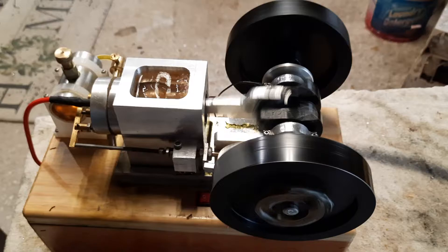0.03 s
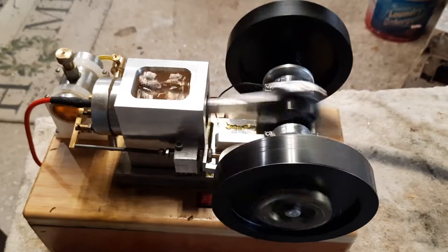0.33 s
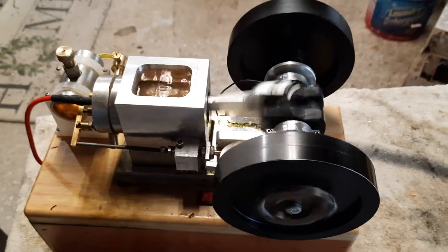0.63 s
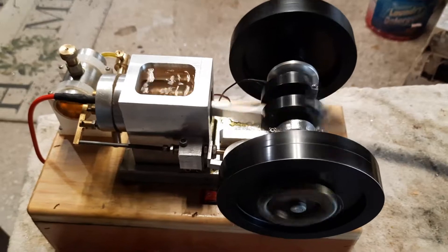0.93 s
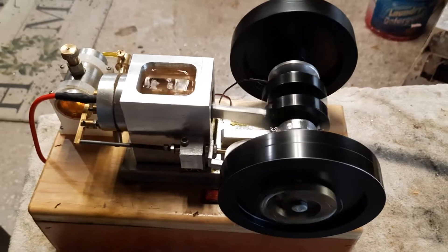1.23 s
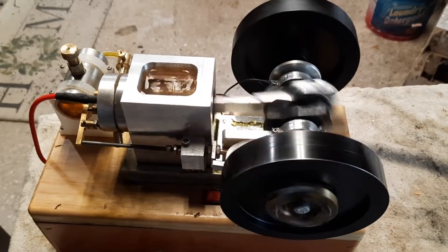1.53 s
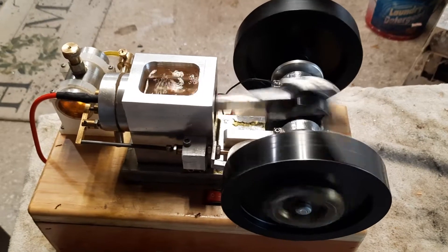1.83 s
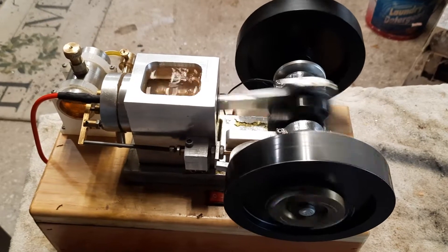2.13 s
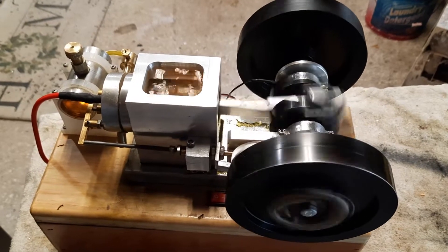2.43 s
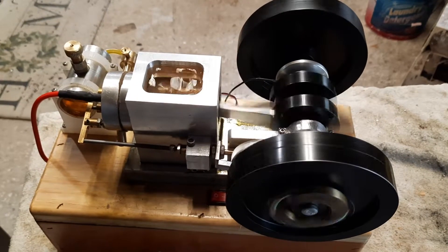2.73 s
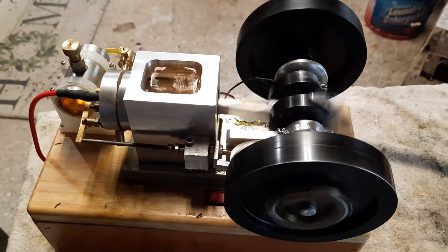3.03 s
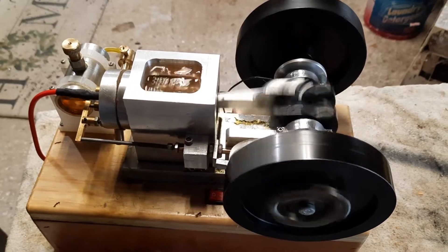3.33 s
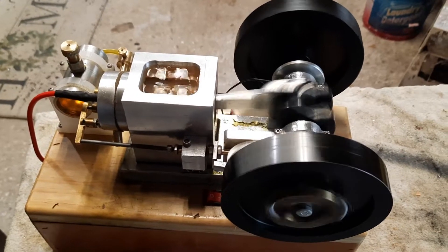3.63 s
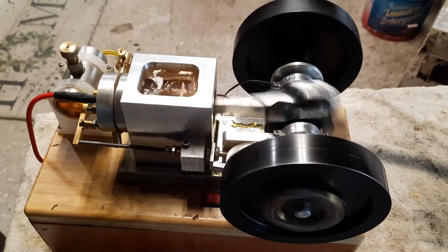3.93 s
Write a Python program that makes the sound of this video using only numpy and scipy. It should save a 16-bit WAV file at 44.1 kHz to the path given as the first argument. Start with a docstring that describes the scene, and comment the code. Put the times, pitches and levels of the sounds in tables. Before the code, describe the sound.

A small gas engine runs close by, firing irregular pops between quick knocks and chuffs.

```python
"""A model hit-and-miss gas engine

The engine runs on a wooden base, close by in a small workshop. Each firing thumps the base, then barks
from the exhaust. While the flywheels coast, the piston pumps air through the open valve once a turn and
the rod knocks at both ends of its stroke. The valve gear clicks, and the governor latch clacks once."""
import sys
import numpy as np
from scipy import signal
from scipy.fft import rfft, irfft
from scipy.io import wavfile
from scipy.ndimage import uniform_filter1d

SR = 44100
rng = np.random.default_rng(int(sys.argv[2]) if len(sys.argv) > 2 else 0)


def store_pcm(level_fs):
    """Save levels as 16-bit WAV."""
    pcm = np.round(np.clip(level_fs, -1, 1) * 32767).astype(np.int16)
    wavfile.write(sys.argv[1], SR, np.atleast_2d(pcm).T)


N = 176400
T = np.arange(N) / SR

# Levels compare the rows of one table; the functions set the final loudness.
# how loud the moving parts are, following flywheel speed: t/s, level/dB
RUNNING_LEVEL = [(.12, -31.5), (.25, -39.5), (.68, -44), (.82, -39.5), (1.3, -38), (1.68, -41.5),
                 (1.82, -35.5), (2.28, -38.5), (2.42, -35.5), (3.05, -37.5), (3.18, -36), (3.8, -36.5),
                 (4.0, -37)]
# the fuel fires: t/s, level/dB
FIRINGS = [(.128, -16), (0.7258, -14.5), (1.7189, -12), (2.3215, -11), (3.083, -10.5), (3.838, -11.5)]
# the exhaust valve opens: t/s, bark level/dB, puff level/dB
EXHAUSTS = [(0.186, -17, -17.5), (0.7777, -17.5, -19), (1.778, -15.5, -33), (2.374, -16, -26),
            (3.1357, -16, -22), (3.888, -14.7, -17.5)]
# the valve gear clicks: t/s, level/dB
CLICKS = [(.198, -27.5), (.6985, -24), (1.005, -33), (1.5105, -25), (1.6195, -30), (1.689, -21),
          (1.963, -21), (2.295, -21), (2.547, -15), (2.727, -14), (3.029, -35), (3.056, -23), (3.525, -16),
          (3.8085, -24.5)]
# the rod knocks at the end of its outward push: t/s, level/dB
KNOCKS = [(0.2225, -19), (0.3128, -14), (0.4072, -13), (0.506, -13.5), (0.6208, -25.5), (0.8098, -18.5),
          (0.8926, -13.5), (0.9786, -14), (1.0681, -11.5), (1.1614, -12.5), (1.2592, -12), (1.3619, -11.5),
          (1.8133, -16.5), (1.9047, -10.5), (2.0, -11.5), (2.0999, -10.5), (2.2158, -17), (2.3996, -31),
          (2.4914, -11), (2.5786, -10.5), (2.6694, -10.5), (2.7642, -10.5), (2.8635, -10.5), (2.9791, -21),
          (3.1683, -16.5), (3.2513, -10.5), (3.3375, -10), (3.4273, -10.5), (3.5211, -9.5), (3.6193, -9.5),
          (3.7331, -18), (3.9203, -15.5)]
# softer knocks half a turn later, and as the engine slows: t/s, level/dB
BACK_KNOCKS = [(.2677, -29), (.3599, -29), (.4563, -30.5), (.5578, -31.5), (.6841, -38), (.8513, -29),
               (.9356, -29), (1.0232, -30), (1.1146, -28), (1.2101, -29), (1.3102, -30), (1.4156, -28.5),
               (1.538, -32), (1.599, -32), (1.6725, -34), (1.8592, -26), (1.9524, -25.5), (2.0499, -25),
               (2.1523, -26), (2.2808, -32), (2.4497, -26), (2.5351, -24.5), (2.624, -27), (2.7168, -26),
               (2.8137, -28), (2.9155, -25), (3.0422, -32), (3.21, -27), (3.2944, -25), (3.3823, -27),
               (3.474, -26.5), (3.57, -26.5), (3.6706, -28), (3.7967, -32.5), (3.9616, -27)]
# air is pushed through the open valve: t/s, rough width/s, level/dB
CHUFFS = [(0.2924, 0.013, -25), (0.3837, 0.017, -26), (0.4847, 0.016, -27.5), (0.583, 0.017, -26.5),
          (0.874, 0.011, -24.5), (0.9573, 0.016, -24), (1.0489, 0.012, -24.5), (1.1407, 0.018, -25),
          (1.2364, 0.014, -26.5), (1.336, 0.017, -24.5), (1.441, 0.015, -30), (1.5606, 0.017, -25),
          (1.8857, 0.014, -23), (1.9765, 0.015, -21.5), (2.0775, 0.014, -23.5), (2.1767, 0.017, -23.5),
          (2.4718, 0.014, -22), (2.558, 0.016, -21), (2.6485, 0.013, -23), (2.742, 0.016, -22),
          (2.842, 0.013, -23.5), (2.9405, 0.017, -23), (3.2337, 0.014, -22), (3.315, 0.018, -21.5),
          (3.4082, 0.015, -23), (3.4966, 0.015, -22), (3.597, 0.015, -23.5), (3.698, 0.016, -23),
          (3.9846, 0.014, -23)]
# the piston draws in fuel and air: t/s, level/dB
INTAKES = [(0.643, -31), (1.535, -32), (1.621, -30), (2.24, -30.5), (3.0, -36), (3.76, -34)]

# ringing tones of the engine and its base: f/Hz, level/dB, time to fade by 60 dB/s
BASE_TONES = [(94, -22, .22), (114.7, -18.5, 0.36), (148.3, -14.5, 0.31), (186, -34.5, 0.37),
              (217, -16.5, 0.32), (250, -18, 0.14), (298.6, -11.5, 0.36), (320, -17, 0.35),
              (344, -14, 0.25), (421.8, -12.5, 0.18), (439.5, -23.5, 0.28), (502, -32, 0.45),
              (634, -18, .15), (696, -25.5, 0.093)]
# tones the rod rings in the frame: f/Hz, level/dB, time to fade by 60 dB/s
FRAME_TONES = [(302.7, -46, 0.35), (637, -33, 0.095), (888, -28, 0.042), (1040, -18.5, 0.071),
               (1126, -36, 0.28), (1234, -20, 0.084), (1609, -14.5, 0.15), (1683, -17, 0.31),
               (1716, -23, 0.3), (1950, -14.5, 0.05)]
# a knock's chirp, left then right: start f/Hz, end f/Hz, glide time/s, level/dB
CHIRPS = [(730, 1763, 0.002, -6), (836, 1668, 0.00091, -7)]
# how the left microphone compares with the right: f/Hz, phase lag/rad, level/dB
LEFT_VS_RIGHT = [(101, 0, 0), (600, 0.21, 2.5), (1930, 1.27, 3.5), (4170, 1.7, -4.5), (8400, 1.01, -2),
                 (13000, 1.65, -0.1), (16000, 1.9, -2)]

# The colour of each noise, or how strong it is from bass to treble: f/Hz, level/dB
BEARING_COLOUR = [(20, -43), (60, -10), (110, -3), (200, 0.5), (300, -0.5), (450, -2.5), (620, 4.5),
                  (780, -14), (1100, -6), (2000, -3.5), (3000, -5), (8000, -45.5), (16000, -72)]
SLIDE_COLOUR = [(100, -30), (500, 2), (1200, 3), (2100, 1.5), (2600, -21.5), (3150, -11), (3800, -1.5),
                (4250, -3), (4500, -17), (5400, -12), (6300, -4), (7000, -15), (8000, -13), (9500, -15.5),
                (13500, -5), (16000, -8.5)]
DRONE_COLOUR = [(100, -60), (260, -27), (296, 6), (335, -16), (700, -65), (16000, -90)]
CRACK_COLOUR = [(300, 7.5), (1000, 4), (2000, 0.5), (2800, -11), (4200, -7), (5800, -5), (8000, -15.5),
                (12000, -17), (16000, -4)]
CLICK_COLOUR = [(500, 3), (2000, 15.5), (4000, 6), (6000, 3.5), (9000, 1.5), (12000, 14.5), (16000, -1)]
BARK_COLOUR = [(200, 0), (1000, -5.5), (2000, 0), (3200, -7), (5500, 0.5), (7000, -2), (8300, 1),
               (9300, -0.5), (10600, 3.5), (12000, 1.5), (13500, 5.5), (16000, -9)]
CHUFF_COLOUR = [(300, -39), (1000, -3), (2500, -11), (3700, -7), (4500, -14), (5600, -5.5), (6900, -8),
                (7400, 1), (7950, 7.5), (8500, -7.5), (9300, -11.5), (10500, -14), (11700, -8.5),
                (13400, 4.5), (14500, 0.5), (16000, -17.5)]
GULP_COLOUR = [(30, -30), (75, -6.5), (105, 7.5), (140, -6.5), (220, -1), (400, -9.5), (1000, -14),
               (4000, -56), (16000, -18)]
LATCH_COLOUR = [(400, -8.5), (1000, 3), (2200, 1), (3900, 3), (4700, -9), (6000, -1), (9000, -22),
                (12500, -1), (16000, -15)]


def undb(db):
    """Turn decibels into a number to multiply by."""
    return 10 ** (np.asarray(db) / 20)


def curve(table, column=1):
    """Join a table's points to get a value at every frequency."""
    freqs = np.fft.rfftfreq(N, 1 / SR)
    points = np.array(table)
    return np.interp(np.log(freqs + 1), np.log(points[:, 0]), points[:, column])


def noise(colour, spread=0.18, grit_db=2.5):
    """Gritty stereo noise, a little late on the left; spread is the part the sides do not share."""
    grit = uniform_filter1d(rng.standard_normal(N), int(0.0012 * SR))
    shared, left, right = rfft(rng.standard_normal((3, N)) * undb(grit_db * grit / grit.std()))
    late = shared * np.exp(-1j * curve(LEFT_VS_RIGHT))
    pair = np.sqrt(1 - spread) * np.array([late, shared]) + np.sqrt(spread) * np.array([left, right])
    balance_db = curve(LEFT_VS_RIGHT, column=2) * np.array([[0.5], [-0.5]])
    sound = irfft(pair * undb(curve(colour) + balance_db), N)
    return sound / sound.std()


def swell(at, rise_s, fall_s, shape=2):
    """A rounded rise and fall that peaks at one moment; a higher shape flattens the top."""
    return np.exp(-np.abs((T - at) / np.where(T < at, rise_s, fall_s)) ** shape)


def strike(at, rise_s, decay_s):
    """A quick rise, then a tail that dies away."""
    return np.exp(-np.where(T < at, ((T - at) / rise_s) ** 2, (T - at) / decay_s))


def play(rows, sound):
    """Play the same short sound at each row's time and level."""
    hits = np.zeros(N)
    for at, db in rows:
        hits[int(np.clip(at * SR, 0, N - 1))] += undb(db)
    return signal.fftconvolve(hits[None], np.atleast_2d(sound), axes=1)[:, :N]


def ring(tones, t, scatter):
    """Fading tones, each shifted at random by up to scatter cycles."""
    return sum(undb(db - 60 * np.abs(t) / fade_s) * np.cos(2 * np.pi * (hz * t + scatter * rng.random()))
               for hz, db, fade_s in tones)


def moving_parts(tick_count=130):
    """Gear teeth tick, bearings rumble, the piston slides and the base hums, softer as the wheels slow."""
    times = rng.random(tick_count) * N / SR
    levels_db = -3 + 8 * rng.standard_normal(tick_count)
    tick = np.exp(-T[:SR // 20] / 0.00073)
    teeth = play(zip(times, levels_db), tick) * noise(CLICK_COLOUR)
    bearings = undb(-2.5) * noise(BEARING_COLOUR, spread=0.074)
    piston = undb(-1.5) * noise(SLIDE_COLOUR)
    drone = undb(-9.5) * noise(DRONE_COLOUR)
    loudness = undb(np.interp(T, *np.array(RUNNING_LEVEL).T))
    return loudness * (teeth + bearings + piston + drone)


def base_thumps(rise_s=0.0066):
    """Each firing shoves the engine and its wooden base, and both ring."""
    lead_s = 2 * rise_s  # start early to leave time for the rise
    t = T[:SR // 2] - lead_s
    fade_in = np.exp(-(np.minimum(t, 0) / rise_s) ** 2)
    thump = ring(BASE_TONES, t, scatter=0.32) * fade_in
    return play([(at - lead_s, db) for at, db in FIRINGS], thump) * np.ones((2, 1))


def firing_cracks(delay_s=0.0031):
    """The burning fuel makes a sharp crack of noise."""
    bursts = sum(undb(db - 9.5) * strike(at + delay_s, rise_s=0.0072, decay_s=0.039) for at, db in FIRINGS)
    return bursts * noise(CRACK_COLOUR)


def rattles_and_clicks(rattle_delays_s=(0.00304, 0.013)):
    """Loose parts rattle after each firing and the valve gear clicks, all in tiny bursts of noise."""
    rattles = [(at + delay, db - 4) for at, db in FIRINGS for delay in rattle_delays_s]
    hits = list(CLICKS) + rattles
    bursts = sum(undb(db + 1) * strike(at, rise_s=0.00037, decay_s=0.0019) for at, db in hits)
    return bursts * noise(CLICK_COLOUR)


def exhaust_barks(rise_s=0.0048):
    """The exhaust valve opens and gas bursts out, with a softer tail."""
    bursts = np.zeros(N)
    for at, db, _ in EXHAUSTS:
        burst = swell(at, rise_s, fall_s=0.005, shape=2.5)
        tail = undb(-9) * strike(at, rise_s, decay_s=0.037)
        bursts += undb(db - 0.5) * (burst + tail)
    return bursts * noise(BARK_COLOUR, grit_db=-1.8)


def exhaust_puffs(pitch_hz=65, drop_hz_per_s=1500, delay_s=0.0096, width_s=0.012):
    """Exhaust air hits the microphone just after each bark: a deep pop that drops in pitch."""
    puffs = np.zeros(N)
    for at, _, db in EXHAUSTS:
        age = T - at - delay_s
        cycles = (pitch_hz - drop_hz_per_s * age / 2) * age
        puffs -= undb(db) * swell(at + delay_s, width_s, width_s) * np.cos(2 * np.pi * cycles)
    return puffs * undb([[-17], [0]])  # mostly on the right


def knock_chirp(t, holds_s=(0.0053, 0.0042), edge_s=0.0005):
    """The short rising note in a rod knock, held a little longer on the left."""
    sides = []
    for (start_hz, end_hz, glide_s, db), hold_s in zip(CHIRPS, holds_s):
        hz = end_hz + (start_hz - end_hz) * np.exp(-t / glide_s)
        fade_in = np.minimum(t / edge_s, 1)
        fade_out = (1 - np.tanh((t - hold_s) / edge_s / 2)) / 2
        sides.append(undb(db) * fade_in * fade_out * np.sin(2 * np.pi * np.cumsum(hz) / SR))
    return np.array(sides)


def rod_knocks(clack_hz=918, clack_s=0.00052, back_hz=1145, back_rise_s=0.0011, back_decay_s=0.0012):
    """The rod knocks with a clack and a chirp, then more softly on the way back; both ring the frame."""
    t = T[:SR // 3]
    frame = np.array([ring(FRAME_TONES, t, scatter=0.74) for _ in range(2)]) * np.minimum(t / 0.001, 1)
    clack_shape = t / clack_s * np.exp(1 - t / clack_s)
    clack = undb(-11) * clack_shape * np.sin(2 * np.pi * clack_hz * t)
    back_shape = np.minimum(t / back_rise_s, np.exp(-(t - back_rise_s) / back_decay_s))
    back = undb(9.5) * back_shape * np.sin(2 * np.pi * back_hz * t)
    return play(KNOCKS, clack + knock_chirp(t) + frame) + play(BACK_KNOCKS, back + undb(-4) * frame)


def pumped_air(suck_delay_s=0.03, suck_s=0.047):
    """The piston pushes air out through the open valve, then draws it back more softly."""
    push = sum(undb(db + 3) * swell(at, 0.82 * width, 0.82 * width, shape=3.73) for at, width, db in CHUFFS)
    suck = sum(undb(db - 14.5) * swell(at + suck_delay_s, suck_s, suck_s) for at, _, db in CHUFFS)
    return push * noise(CHUFF_COLOUR, grit_db=0.5) + suck * noise(SLIDE_COLOUR)


def intake_gulps(width_s=0.024):
    """The piston takes a short, low gulp of air before a firing."""
    gulps = sum(undb(db - 4) * swell(at, width_s, width_s) for at, db in INTAKES)
    return gulps * noise(GULP_COLOUR, spread=0.033)


def governor_latch(at=1.4478, rise_s=0.0013):
    """The latch of the governor, the part that limits the speed, drops out with one clack."""
    blow = swell(at, rise_s, fall_s=0.0028)
    tail = undb(-14) * strike(at, rise_s, decay_s=0.012)
    return undb(-16) * (blow + tail) * noise(LATCH_COLOUR, grit_db=-1.8)


def workshop_echo(sound, low_fade_s=0.22, high_fade_s=0.28, split_hz=3000, gap_s=0.0022):
    """The walls send back a short wash of echoes; the treble lasts a little longer."""
    t = T[:SR // 2]
    white = rng.standard_normal((2, len(t)))
    low = signal.sosfilt(signal.butter(2, split_hz, fs=SR, output="sos"), white)
    high = white - low
    tail = (low * undb(-60 * t / low_fade_s) + high * undb(-60 * t / high_fade_s)) * (t > gap_s)
    tail /= np.sqrt((tail ** 2).sum() / 2)
    return signal.fftconvolve(sound, tail, axes=1)[:, :N]


def scene():
    """Add up all the parts of the engine and their echo."""
    bursts = firing_cracks() + exhaust_barks() + pumped_air()
    bursts += rattles_and_clicks() + governor_latch() + intake_gulps()
    knocks, thumps = rod_knocks(), base_thumps()
    echo = workshop_echo(undb(-10) * bursts + undb(-15.5) * knocks + undb(-15) * thumps)
    return bursts + knocks + thumps + exhaust_puffs() + echo + moving_parts()


def record(dry):
    """Start after a moment of silence, and cut the deepest bass and the highest treble."""
    start_s, low_cut_hz, high_cut_hz = 0.121, 59, 16000
    fade_in = np.clip((T - start_s) / 0.003, 0, 1)
    trimmed = signal.sosfilt(signal.butter(2, low_cut_hz, "high", fs=SR, output="sos"), dry * fade_in)
    return signal.sosfilt(signal.ellip(10, 0.2, 80, high_cut_hz, fs=SR, output="sos"), trimmed)


dry = scene()
out = record(dry)
store_pcm(out)
```